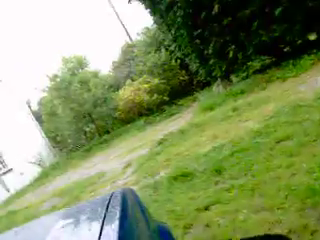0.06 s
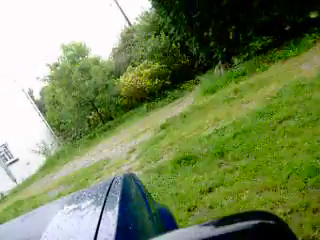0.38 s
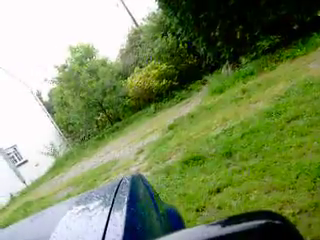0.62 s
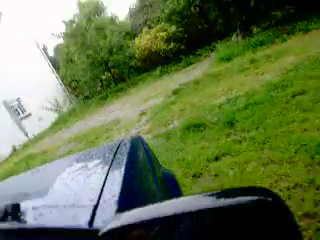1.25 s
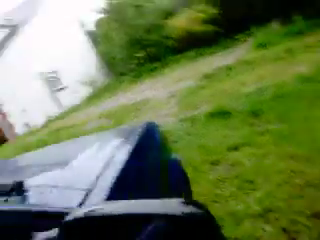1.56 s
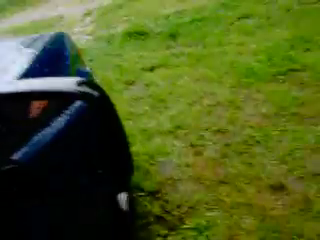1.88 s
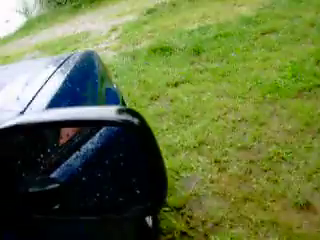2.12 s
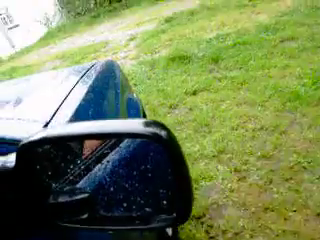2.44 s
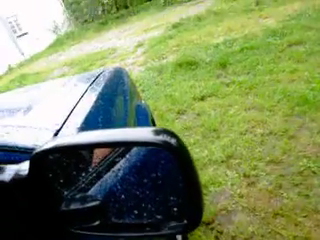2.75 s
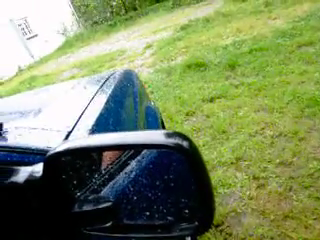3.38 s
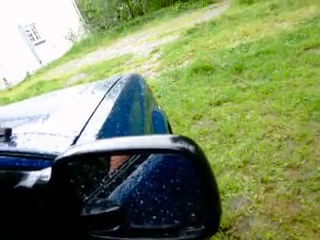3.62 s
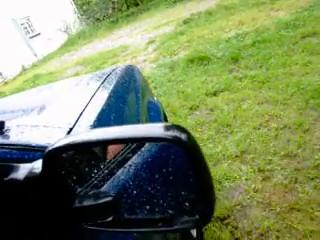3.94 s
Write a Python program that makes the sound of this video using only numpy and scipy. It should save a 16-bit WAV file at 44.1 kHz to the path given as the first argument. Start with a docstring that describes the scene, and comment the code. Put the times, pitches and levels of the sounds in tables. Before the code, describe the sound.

A car engine with an open exhaust booms through five short, raspy revs.

```python
"""A car engine booms and burbles at low speed, then revs up in five short presses of the pedal.
It has four cylinders and no silencer, and is heard outdoors from the driver's window.
Each firing booms down the exhaust and rings the pipe, over the clatter of the engine block.
With the pedal down the gas barks, rasps and hisses; the first press has a few sharp cracks.
The boom dips around pedal changes and as a cylinder misfires while coasting. A house wall answers."""
import sys
import numpy as np
from scipy import signal
from scipy.fft import rfft, irfft, next_fast_len
from scipy.io import wavfile
from scipy.ndimage import map_coordinates

SR = 44100
rng = np.random.default_rng(int(sys.argv[2]) if len(sys.argv) > 2 else 0)


def put_to_file(sound):
    """Save the sound as 16-bit audio at rate SR, in the file named by the first command-line argument."""
    columns = np.atleast_2d(sound).T  # one column per channel
    safe = np.clip(columns, -1, 1)
    whole_steps = np.round(safe * 32767)
    wavfile.write(sys.argv[1], SR, whole_steps.astype(np.int16))


N = 176400  # 4 seconds

# The exhaust's boom. Each row: time in seconds, base level in dB.
BOOM_LEVEL = [(.04, -16.5), (.2, -16.5), (.28, -10), (.35, -8.5), (.42, -13), (.57, -16), (.7, -14.5),
              (1, -14.5), (1.58, -16.5), (1.68, -10), (1.85, -18), (1.93, -14), (2.17, -15.5), (2.27, -11),
              (2.44, -19), (2.6, -13.5), (2.75, -15.5), (2.95, -14), (3.03, -10), (3.2, -18), (3.35, -20),
              (3.6, -13.5), (3.69, -17), (3.75, -13.5), (3.87, -18), (4, -18)]
# Pedal presses. Each row: start and release in seconds, strength in dB,
# change while held in dB per second, hiss in dB relative to that strength.
PRESSES = [(0.228, 0.527, 0, -10.5, -42), (1.615, 1.824, 0.5, -19, -39), (2.209, 2.409, 0, -22, -41.5),
           (2.984, 3.254, -1, -11.5, -43), (3.677, 4.1, -4, 2.5, -40)]
# The tone of the rasp and the cracks. Each row: frequency in Hz, relative level in dB.
RASP_TONE = [(200, -12), (400, -17.5), (480, -6), (780, -11), (930, -7.5), (1100, -16.5), (1260, -2.5),
             (1380, -9), (1550, -5.5), (1780, -16), (2050, -12.5), (2600, -17.5), (3200, -10.5),
             (3900, -17.5)]
MID_SPEED = 88.1  # firings per second; bark and rasp grow above this speed and fade below it


def amp(db):
    """Turn decibels into a gain."""
    return 10 ** (np.asarray(db) / 20)


def unit(x):
    """Scale a signal to an average power of 1."""
    return x / np.sqrt(np.mean(x ** 2) + 1e-20)


def level_at(tone, hz):
    """Read a level between (Hz, dB) rows, on a logarithmic frequency scale."""
    freqs, levels = np.transpose(tone)
    return np.interp(np.log(hz + 1), np.log(freqs + 1), levels)


def clock():
    """The time of every sample in seconds."""
    return np.arange(N) / SR


def curve(rows):
    """Join (seconds, value) rows with straight lines."""
    return np.interp(clock(), *np.transpose(rows))


def wobble(rate):
    """A smooth curve through `rate` random values a second."""
    return map_coordinates(rng.standard_normal(4096), [np.arange(N) * rate / SR], mode="wrap")


def filtered(x, gain_at):
    """Scale each frequency in x by gain_at(hz)."""
    size = next_fast_len(N + SR // 2)
    return irfft(rfft(x, size) * gain_at(np.fft.rfftfreq(size, 1 / SR)), size)[:N]


def coloured(x, tone):
    """Give x a tone from (Hz, dB) rows, at an average power of 1."""
    return unit(filtered(x, lambda hz: amp(level_at(tone, hz))))


def exhaust(count, speed, load, lost_db):
    """Each firing sends a pressure wave down the exhaust: a round boom that sharpens under load."""
    # Overtones when coasting (soft) and under load (hard). Each row: frequency in Hz, base level in dB.
    soft_tone = [(80, -15), (98, -25), (115, -38), (170, -39.5), (200, -27), (300, -63), (450, -84)]
    hard_tone = [(95, -27), (125, -10), (160, -25), (220, -24.5), (290, -28.5), (390, -30.5), (480, -41),
                 (900, -61.5)]
    phase = 2 * np.pi * count
    slip = 0.087 * lost_db  # radians that a stumble shifts the wave
    boom = amp(curve(BOOM_LEVEL) - lost_db + .6 * wobble(40)) * np.cos(phase + .5 + slip)
    push = load * amp(0.34 * (speed - MID_SPEED) + 0.33 * wobble(71))
    coasting = 1 - np.clip(load, 0, 1)
    overtones = np.zeros(N)
    for k in range(2, 14):
        hz = k * speed
        soft = coasting * amp(level_at(soft_tone, hz) + 0.91 * wobble(23))
        hard = push * amp(level_at(hard_tone, hz))
        angle = k * (phase + 0.015 * k * wobble(110))  # higher overtones are rougher
        # Overtones below the pipe's lowest resonance flatten the wave's peaks.
        lag = np.pi * np.clip((145 - hz) / 40, 0, 1)
        overtones += soft * np.sin(angle) + hard * np.cos(angle + lag)
    throb = 1 + 0.1 * np.cos(phase / 4) + 0.14 * np.cos(phase / 2)
    return np.sqrt(2) * (boom + overtones) * throb


def pipe_ring(count, speed, lost_db):
    """The open pipe sings on the overtones that pass its two resonances, more so in a stumble."""
    # The pipe's ring. Each row: time in seconds, base level in dB.
    ring_level = [(.04, -25.5), (.2, -22.5), (.27, -52.5), (.58, -37.5), (.65, -27.5), (.8, -31),
                  (.95, -28.5), (1.28, -29.5), (1.5, -24), (1.62, -24.5), (1.7, -47), (1.88, -28),
                  (2.14, -25), (2.3, -33), (2.44, -29), (2.53, -36.5), (2.78, -25), (3.05, -34.5),
                  (3.6, -32.5), (3.68, -18.5), (3.82, -29)]
    # The main resonance drifts with the heat of the gas. Each row: time in seconds, pitch in Hz.
    pipe_pitch = [(.2, 214.4), (.55, 249), (.8, 204.7), (.93, 248.5), (1.25, 206.7), (1.45, 239),
                  (1.9, 241.7), (2.12, 208.3), (2.45, 259.6), (2.7, 224.5), (2.9, 220.4), (3.3, 300),
                  (3.64, 226.4), (4, 291)]
    half_width_hz, upper_hz = 25.1, 379.3
    phase = 2 * np.pi * count
    multiples = np.arange(4, 21)[:, None] / 2  # of the firing rate, in halves
    # The in-between multiples (2.5, 3.5, ..) stay weak until the boom stumbles.
    drive = np.where(multiples % 1 > 0, np.minimum(amp(-13 + 2 * lost_db), 1), 1)
    resonance = lambda hz: 1 / (1 + 1j * (multiples * speed - hz) / half_width_hz) ** 2
    gains = drive * (resonance(curve(pipe_pitch)) + amp(-19) * resonance(upper_hz))
    waves = np.exp(1j * multiples * (phase + 0.036 * wobble(45)))
    ring = np.real(gains * waves).sum(axis=0) / np.linalg.norm(gains, axis=0)
    throb = 1 + 0.3 * np.cos(phase / 4)
    return ring * throb * amp(curve(ring_level) + .58 * lost_db + 1.8 * wobble(36))


def firings(count, speed, scatter_db, uneven):
    """One click per firing, with the same average power at any engine speed."""
    # The four cylinders in firing order. Each value: strength in dB, before scaling by `uneven`.
    cylinders = [7.5, -4.5, -2.5, -0.5]
    at = np.flatnonzero(np.diff(np.floor(count)) > 0)
    db = scatter_db * rng.standard_normal(1024)[:len(at)] + uneven * np.resize(cylinders, len(at))
    clicks = np.zeros(N)
    clicks[at] = amp(db) / np.sqrt(speed[at])
    return clicks


def puffs(clicks, decay_s, steady):
    """Noise that flares at every firing, above a steady floor."""
    t = np.arange(SR // 16) / SR
    flare = unit(signal.fftconvolve(clicks, np.exp(-t / decay_s))[:N])
    return unit((flare + steady) * rng.standard_normal(N))


def knocks(clicks, decay_s):
    """The same short metallic ring at every firing."""
    t = np.arange(SR // 16) / SR
    ring = np.exp(-t / decay_s) * rng.standard_normal(len(t))
    return unit(signal.fftconvolve(clicks, ring)[:N])


def clatter(count, speed):
    """The engine block clatters and rumbles and the valves tick, all the time."""
    # Loudness of the block's clatter and the valves' ticks. Each row: time in seconds, level in dB.
    clatter_level = [(0, -34), (.3, -40.5), (.65, -44.5), (1.2, -41.5), (1.55, -38), (2, -41.5),
                     (3.35, -41), (3.6, -38.5)]
    tick_level = [(0, -53.5), (1.5, -52.5), (2.1, -48), (3.35, -53.5), (3.52, -41.5), (3.65, -47.5)]
    # The tones of the three noises. Each row: frequency in Hz, relative level in dB.
    clatter_tone = [(200, -24), (385, 1), (470, -9.5), (600, -10), (740, -8.5), (920, -8), (1050, -15.5),
                    (1300, -10.5), (1750, -16.5), (3100, -18.5), (3900, -25)]
    tick_tone = [(1800, -31), (3250, -4), (3420, 9.5), (3600, -6.5), (3900, -10.5)]
    rumble_tone = [(15, -36.5), (60, 6), (125, -12), (270, -3.5), (330, -21), (390, -12.5), (480, -28.5),
                   (900, -40.5)]
    clicks = firings(count, speed, scatter_db=0.7, uneven=0.73)
    metal = puffs(clicks, decay_s=0.018, steady=3.6) + 0.27 * knocks(clicks, decay_s=0.013)
    block = coloured(metal, clatter_tone)
    ticks = coloured(puffs(clicks, decay_s=0.0056, steady=1.8), tick_tone)
    rumble = coloured(puffs(clicks, decay_s=0.0087, steady=0.12), rumble_tone)
    return amp(curve(clatter_level)) * block + amp(curve(tick_level)) * ticks + amp(-29.5) * rumble


def pedal(start, release, db, db_per_s):
    """The load from one press of the pedal: it bites quickly, holds and lets go."""
    open_s, close_s = 0.041, 0.051
    t = clock()
    opening = np.sqrt(np.clip((t - start) / open_s, 0, 1))
    closing = np.clip(1 - (t - release) / close_s, 0, 1)
    held_s = np.clip(t - start, 0, release - start)
    return opening * closing * amp(db + db_per_s * held_s)


def rasp(count, speed, load):
    """Gas rushes out of the pipe in rough puffs while the pedal is down."""
    clicks = firings(count, speed, scatter_db=-2.1, uneven=0.27)
    gas = puffs(clicks, decay_s=0.0075, steady=0.25) + 0.45 * knocks(clicks, decay_s=0.007)
    return amp(0.0872 * (speed - MID_SPEED) - 28) * load * coloured(gas, RASP_TONE)


def crackle(count, speed, load):
    """The strongest pressure waves tear the gas into a broad, bright crackle."""
    # The tone of tearing gas. Each row: frequency in Hz, relative level in dB.
    crackle_tone = [(1000, -26.5), (2000, -2.5), (2800, -1), (3600, -18.5)]
    clicks = firings(count, speed, scatter_db=1, uneven=.4)
    gas = puffs(clicks, decay_s=.008, steady=.5)
    return amp(2 * curve(BOOM_LEVEL) - 18) * load * coloured(gas, crackle_tone)


def hiss(count):
    """A narrow hiss rides on each press, sinking in pitch and pulsing with the firings."""
    start_hz, sink_hz_per_s, width_hz = 3548, 1800, 520
    sound = np.zeros(N)
    for start, release, db, db_per_s, hiss_db in PRESSES:
        pitch = start_hz - sink_hz_per_s * np.clip(clock() - start, 0, .2)
        low_noise = wobble(width_hz) + 1j * wobble(width_hz)
        band = np.real(low_noise * np.exp(2j * np.pi * np.cumsum(pitch) / SR))  # moved up to the pitch
        sound += amp(hiss_db) * pedal(start, release, db, db_per_s) * band
    return sound * (1 + .5 * np.sin(2 * np.pi * count))


def bursts(rows, tone, rise_s, decay_s):
    """A short noise that swells and dies away, once per row."""
    shape = np.zeros(N)
    for start, db in rows:
        age = np.maximum(clock() - start, 0)
        shape += amp(db) * (1 - np.exp(-age / rise_s)) * np.exp(-age / decay_s)
    return shape * coloured(rng.standard_normal(N), tone)


def coughs():
    """A single cylinder coughs now and then at lower speeds."""
    # The coughs. Each row: start in seconds, strength in dB.
    events = [(.229, -27.5), (.795, -33), (2.066, -31), (2.125, -34), (2.185, -28.5), (2.68, -36.5),
              (2.745, -30), (2.805, -27.5), (2.862, -39), (2.918, -32)]
    # Their tone. Each row: frequency in Hz, relative level in dB.
    cough_tone = [(100, -15.5), (500, -2.5), (1300, -12), (2500, -4.5), (3400, 17.5), (4100, -17.5)]
    return bursts(events, cough_tone, rise_s=.003, decay_s=0.0052)


def wall_echo(x, delay_s, fade_s):
    """A house wall scatters the sound back; the echo falls 60 dB in fade_s."""
    t = np.arange(SR // 2) / SR
    tail = rng.standard_normal(len(t)) * amp(-60 * t / fade_s) * (t > delay_s)
    return signal.fftconvolve(x, tail / np.linalg.norm(tail))[:N]


def cracks():
    """A few sharp cracks in the first press: an overload tick, then exhaust pops."""
    # The cracks. Each row: start in seconds, strength in dB.
    events = [(.339, -21), (.353, -22), (.415, -29), (.488, -22.5)]
    return bursts(events, RASP_TONE, rise_s=0.00044, decay_s=0.0075)


def stumbles():
    """Brief dips in the boom at listed times: around pedal changes, and misfires while coasting."""
    # The dips. Each row: middle in seconds, depth in dB, half-length in seconds.
    dips = [(0.583, 13.5, 0.0056), (0.86, 9, 0.035), (1.892, 13.5, 0.006), (2.095, 13, 0.0066),
            (2.161, 6, 0.011), (2.467, 10, 0.015), (2.714, 16.5, 0.014), (2.779, 12.5, 0.0094),
            (2.834, 3.5, 0.012), (2.903, 0, 0.017), (3.296, 5, 0.018), (3.624, 13.5, 0.0045),
            (3.665, 9.5, 0.02)]
    return sum(db * np.exp(-((clock() - middle) / half) ** 2) for middle, db, half in dips)


def barks():
    """One cylinder barks in single puffs at high speed."""
    # The barks. Each row: start in seconds, strength in dB.
    events = [(3.243, -27), (3.902, -32.5), (3.938, -23.5), (3.973, -27)]
    # Their tone. Each row: frequency in Hz, relative level in dB.
    bark_tone = [(400, -31.5), (620, -5.5), (850, -9.5), (1150, -33.5)]
    return bursts(events, bark_tone, rise_s=0.0036, decay_s=.014)


def scene():
    """The whole engine in one channel; only the bright noises get an echo."""
    # Engine speed. Each row: time in seconds, firings per second.
    engine_speed = [(0.04, 40.6), (.22, 46.1), (.33, 63.5), (.47, 73.4), (.56, 78), (.65, 69), (.85, 64.5),
                    (1.11, 53.8), (1.3, 51.7), (1.59, 46.9), (1.76, 69.7), (1.86, 80.7), (2.2, 61.8),
                    (2.3, 74.8), (2.43, 88.4), (2.61, 79.7), (2.8, 68), (2.95, 57.5), (3.13, 84.4),
                    (3.27, 100.2), (3.36, 95), (3.65, 79), (3.71, 79.6), (3.86, 100.6), (4, 112.7)]
    speed = curve(engine_speed)
    count = np.cumsum(speed * (1 + .006 * wobble(30))) / SR  # firings so far, slightly unsteady
    load = sum(pedal(*press[:4]) for press in PRESSES)
    lost_db = stumbles()
    bright = rasp(count, speed, load) + crackle(count, speed, load) + hiss(count)
    bright += cracks() + coughs() + barks()
    bright += amp(-10) * wall_echo(bright, delay_s=0.012, fade_s=0.47)
    engine = exhaust(count, speed, load, lost_db) + pipe_ring(count, speed, lost_db)
    return (engine + clatter(count, speed) + bright)[None]


def record(dry):
    """A microphone rounds off the highest peaks, opens just after the start and loses the high treble."""
    # The microphone's response. Each row: frequency in Hz, gain in dB.
    mic_tone = [(15, -5), (32, -0.5), (3700, 1.5), (4000, -0.5), (4200, -8), (4600, -36.5)]
    peak_limit, start_s, top_hz = .75, .035, 4915
    rounded = dry[0] / (1 + np.abs(dry[0] / peak_limit) ** 6) ** (1 / 6)
    dulled = filtered(rounded, lambda hz: amp(level_at(mic_tone, hz)))
    opened = dulled * np.clip((clock() - start_s) / 0.0015, 0, 1)
    return filtered(opened, lambda hz: hz < top_hz)[None]


dry = scene()
out = record(dry)
put_to_file(out)
```